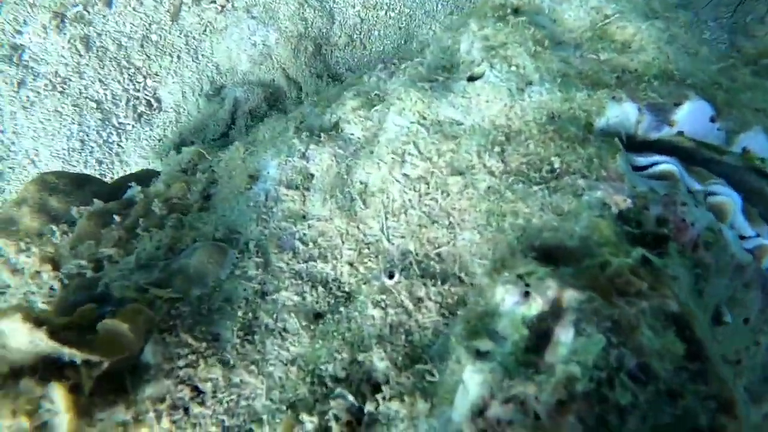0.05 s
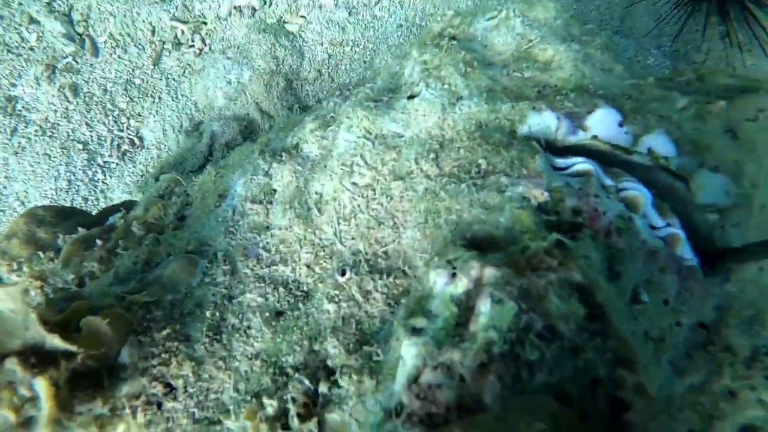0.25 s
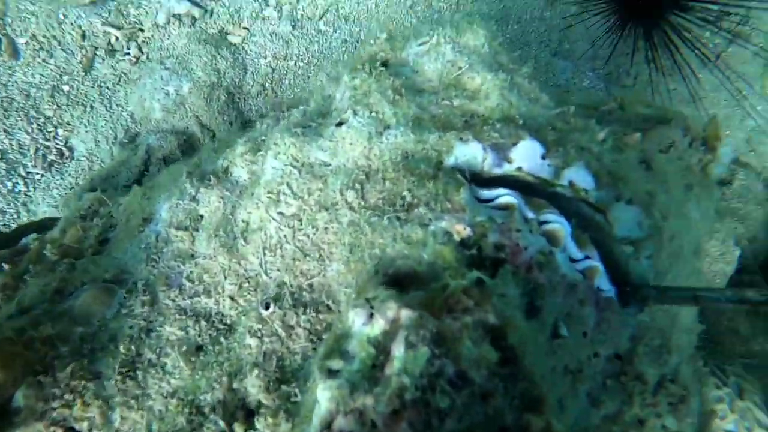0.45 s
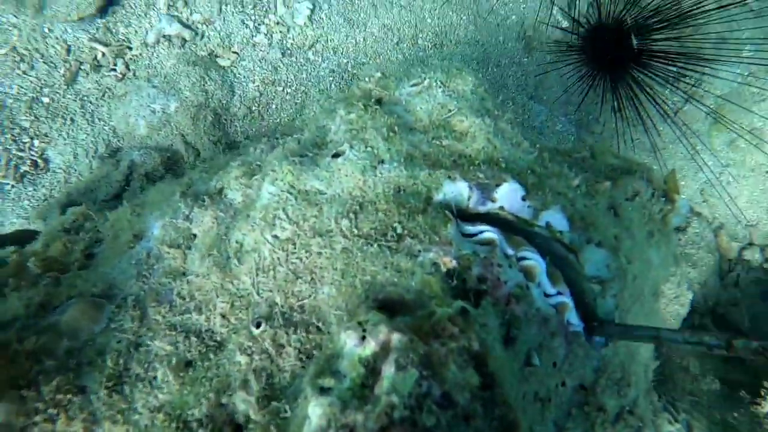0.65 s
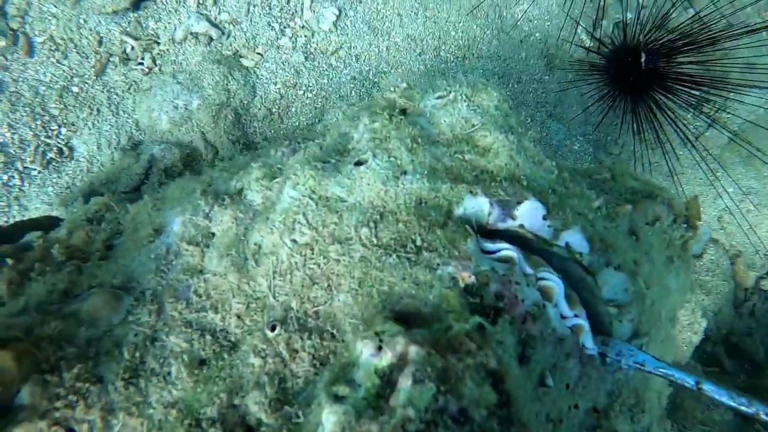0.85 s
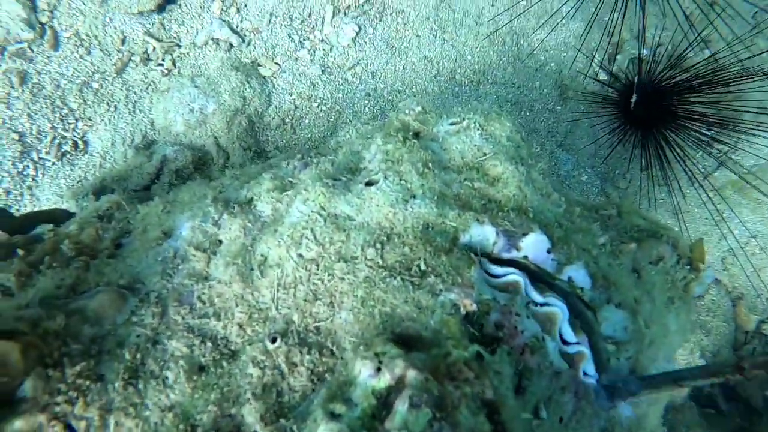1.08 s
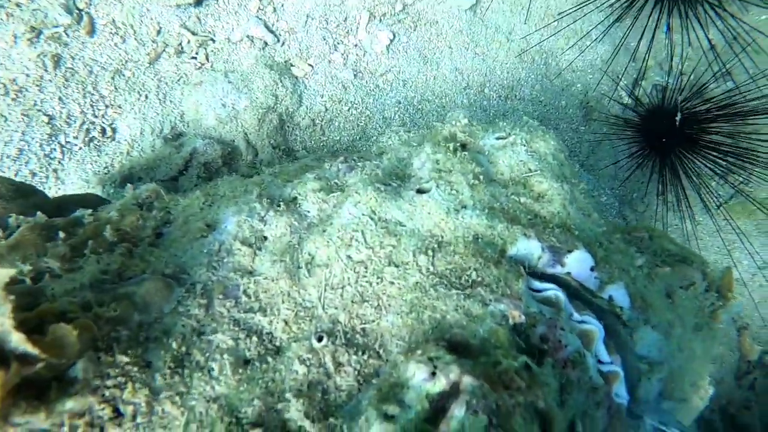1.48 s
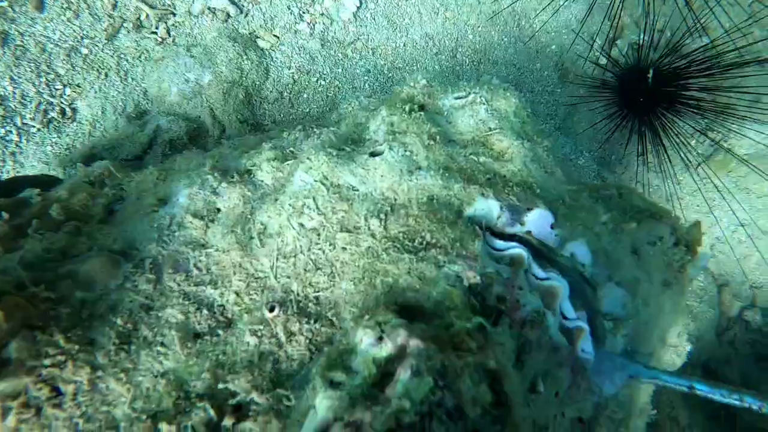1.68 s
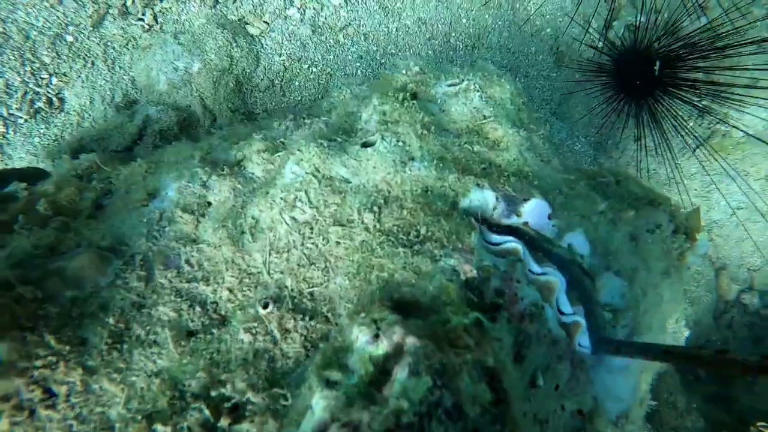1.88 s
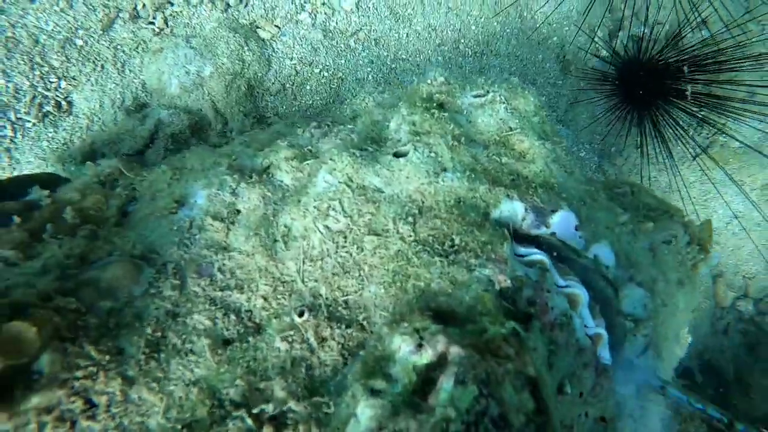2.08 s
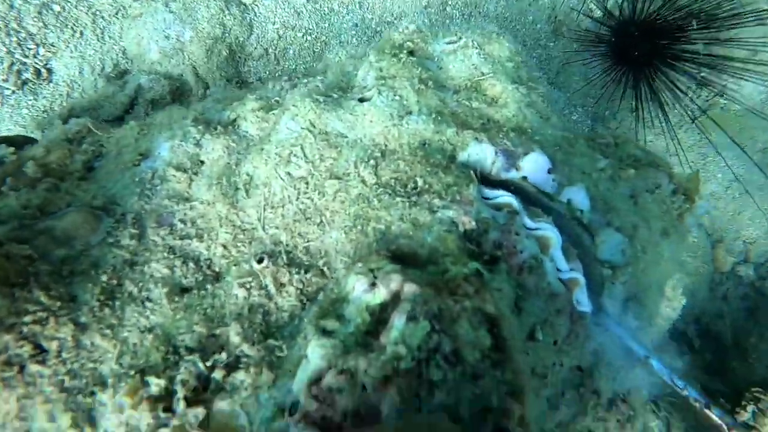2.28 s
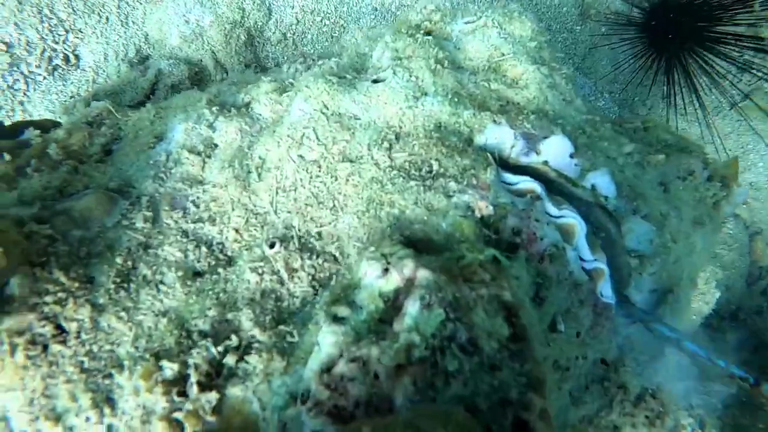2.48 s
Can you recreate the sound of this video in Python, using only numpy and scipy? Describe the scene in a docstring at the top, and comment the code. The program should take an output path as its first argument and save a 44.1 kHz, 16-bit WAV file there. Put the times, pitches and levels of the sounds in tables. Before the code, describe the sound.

A rod scrapes and knocks at a clam underwater, muffled by a camera housing, over constant low water rumble. Soft gurgles come in the first 0.7 seconds, with handling thumps around 0.4. Gritty, hollow strokes and small shell ticks follow, with stronger knocks near 0.8, 1.3 and 2.2 seconds and a heavy thump at 2. The rod catches and chatters from 1.9 to 2.4, then tiny bubbles pop.

```python
"""Prodding a clam under water

A rod pokes and scrapes at a clam in a rock, heard through a hand-held camera housing. Gritty strokes and knocks
ring the housing: hollow below 1 kHz, with metallic rings up to several kHz. The rod catches and chatters; grit
and shell tick. Handling thumps the housing, bubbles gurgle and pop, and moving water rumbles throughout."""
import sys
import numpy as np
from scipy import signal
from scipy.fft import rfft, irfft, next_fast_len
from scipy.io import wavfile
from scipy.ndimage import uniform_filter1d, map_coordinates

SR = 44100
rng = np.random.default_rng(int(sys.argv[2]) if len(sys.argv) > 2 else 0)


def bounce(signal):
    """Save signal as a 16-bit WAV file at the path given by the first command-line argument."""
    frames = np.transpose(np.atleast_2d(signal))
    limited = np.clip(frames, -1, 1)
    pcm = np.round(limited * 32767).astype(np.int16)
    wavfile.write(sys.argv[1], SR, pcm)


N = 116865

# Water rumble spectrum. Each row: frequency in Hz, gain in dB.
RUMBLE_SPECTRUM = [(12, -18.5), (28, -3.5), (70, -5), (120, -12), (250, -27.5), (1500, -83.5)]
# Rumble envelope. Each row: time in seconds, level in dB.
RUMBLE_LEVELS = [(0, -46), (.26, -33.5), (.6, -35), (.9, -30.5), (1.05, -41.5), (1.23, -33), (1.3, -29),
                 (1.7, -37.5), (2.0, -29.5), (2.3, -30), (2.45, -39), (2.65, -39.5)]
# Gurgles. Each row: start in seconds, length in seconds, level in dB, relative fizz in dB.
GURGLES = [(0.138, 0.067, -33.5, -59), (0.221, 0.041, -31, -40.5), (0.264, 0.061, -30.5, -52),
           (0.583, 0.071, -30, -45)]
# Gurgle cavity. Each row: frequency in Hz, width in Hz, relative level in dB.
CAVITY_MODES = [(204, 64, 5.5), (605, 128, -1.5)]
# Knocks on the housing. Each row: time in seconds, push in dB, hollow ring in dB, rasp in dB.
KNOCKS = [(.2366, -18, -16, -30), (.4122, -13, -23, -32), (.4553, -9, -14, -20), (.6365, -13, -19, -30),
          (.8130, -4, -11, -23), (.8268, -9, -19, -24), (.8387, -10, -26, -26), (.9030, -22, -21, -18),
          (.9215, -20, -22, -16), (1.2671, -5, -12, -14), (1.4117, -12, -19, -17), (1.5555, -24, -24, -22),
          (1.5805, -22, -25, -24), (1.8768, -9, -14, -24), (1.932, -17, -18, -23), (2.017, -20, -12, -18),
          (2.051, -22, -22, -30), (2.1578, -4, -12, -28), (2.2018, -14, -19, -32), (2.229, -18, -22, -34),
          (2.3495, -24, -13, -17)]
# Housing's hollow ring. Each row: frequency in Hz, gain in dB.
HOLLOW_RESPONSE = [(40, -14.5), (130, -2.5), (300, -2), (440, 5.5), (505, 6), (555, 5.5), (640, -2),
                   (760, -4), (1000, -34.5), (1400, -63)]
# Housing's rasping upper resonances. Each row: frequency in Hz, gain in dB.
RASP_RESPONSE = [(300, -42.5), (650, 0), (800, 0.5), (870, 0.5), (955, 6.5), (1080, -13.5), (1300, -19),
                 (1680, -20), (1950, -33), (2500, -44), (3200, -107.5)]
# Metallic ring of rod and housing under grit. Each row: frequency in Hz, gain in dB.
GRIT_RESPONSE = [(600, 3), (1300, 2), (1560, 12), (1910, 0), (2090, 7), (2290, -1), (2580, 8), (3200, -13),
                 (3680, 1), (3970, -12), (4280, 0), (4800, 3), (5400, -10), (5950, -3), (6350, -10),
                 (6680, -3), (8400, -17), (10500, -22), (13500, -11), (16000, -13)]
# Rod strokes. Each row: start in seconds, end in seconds, hollow ring in dB, rasp in dB, grit in dB.
STROKES = [(0.381, 0.495, -26.5, -45, -67), (0.564, 0.589, -30.5, -40, -70),
           (0.629, 0.649, -27.5, -46, -82), (.804, 0.831, -20.5, -32.5, -64.5),
           (0.843, 0.883, -23, -29, -56), (0.894, .93, -27, -31, -55.5), (1.028, 1.06, -28.5, -35, -70.5),
           (1.076, 1.156, -36.5, -37.5, -69), (1.173, 1.201, -27.5, -31.5, -65.5),
           (1.194, 1.258, -40.5, -42.5, -73), (1.259, 1.27, -19, -23, -58), (1.271, 1.326, -31, -40, -67.5),
           (1.347, 1.419, -29, -39, -61), (1.474, 1.495, -25, -36, -67), (1.516, 1.62, -33.5, -45.5, -67.5),
           (1.695, 1.724, -33.5, -45.5, -73), (1.765, 1.789, -30, -38.5, -81),
           (1.829, 1.912, -37, -40, -79.5), (1.908, 1.969, -25, -34.5, -69),
           (1.976, 2.05, -27.5, -39.5, -67.5), (2.059, 2.141, -31.5, -47.5, -72),
           (2.131, 2.233, -28.5, -38.5, -62), (2.245, 2.354, -27, -37.5, -61),
           (2.343, 2.361, -29.5, -25, -53.5), (2.618, 2.657, -37, -48, -75)]
# Light rubbing under the strokes: hollow ring, rasp and grit, each in dB.
RUB_DB = [-44, -50, -81]
# Handling thumps. Each row: time in seconds, pitch in Hz, peak in dB.
THUMPS = [(0.397, 70, -11.5), (0.425, 72, -12), (0.458, 50, -13.5), (0.49, 45, -17.5), (0.823, 60, -13.5),
          (1.284, 66, -13.5), (2.025, 68, -6), (2.155, 60, -12)]
# Snaps of grit and shell. Each row: time in seconds, peak in dB, low-pass cutoff in Hz.
TICKS = [(0.451, -28, 2500), (0.8114, -34.5, 12200), (0.8987, -36.5, 12100), (.919, -28, 12300),
         (1.054, -42, 8850), (1.2644, -41, 2500), (1.4097, -44, 9000), (1.579, -38.5, 6000),
         (1.6865, -30.5, 5000), (1.963, -47.5, 3500), (2.0185, -34, 2650), (2.3459, -32, 7000)]
# Rod catches. Each row: start in seconds, length in seconds, pitch in Hz, level in dB.
CATCHES = [(1.088, 0.018, 380, -32.5), (1.242, 0.0055, 880, -27.5), (1.919, 0.025, 600, -23),
           (2.293, 0.019, 322, -24), (2.004, 0.012, 500, -24), (2.139, 0.012, 440, -21.5),
           (2.198, 0.021, 430, -22), (2.27, 0.005, 480, -22.5), (2.299, 0.023, 560, -15.5),
           (2.332, 0.0085, 379.3, -23.5), (2.341, 0.0033, 870, -29.5), (2.359, 0.016, 565, -19),
           (2.385, .026, 535, -31.5)]
# Single bubbles. Each row: start in seconds, pitch in Hz, envelope peak in dB, decay in seconds.
BUBBLES = [(2.45, 413, -22.5, 0.0016), (2.493, 575, -28, 0.0042), (2.492, 867, -31, 0.0017)]


def undb(db):
    return 10 ** (np.asarray(db) / 20)


def unit_rms(x):
    return x / np.sqrt(np.mean(x ** 2))


def steady_rms(x, window_s=.025):
    """Hold the running rms at 1, keeping the fine grain."""
    return x / np.sqrt(uniform_filter1d(x ** 2, int(window_s * SR)))


def colour(x, response):
    """Minimum-phase filter through (Hz, dB) points."""
    hz, db = np.array(response).T
    size = next_fast_len(2 * N)
    bins_hz = np.maximum(np.fft.rfftfreq(size, 1 / SR), 1)
    gain = undb(np.interp(np.log(bins_hz), np.log(hz), db))
    cepstrum = irfft(np.log(gain), size)
    cepstrum[1:size // 2] *= 2
    cepstrum[size // 2 + 1:] = 0
    return irfft(rfft(x, size) * np.exp(rfft(cepstrum)), size)[:N]


def resonate(x, hz, width_hz, passes=1):
    """Two-pole band-pass per pass, gain 1 at the centre."""
    for _ in range(passes):
        x = signal.lfilter(*signal.iirpeak(hz, hz / width_hz, fs=SR), x)
    return x


def wander(rate_hz):
    """Smooth random motion, rms 1."""
    knots = rng.standard_normal(2048)
    return unit_rms(map_coordinates(knots, [np.arange(N) / SR * rate_hz], mode="wrap"))


def grains(per_s, spread_db):
    """Random clicks; spread_db makes a few much larger."""
    occurs = rng.random(N) < per_s / SR
    size = np.minimum(rng.exponential(size=N), 5)
    return occurs * undb(spread_db * size) * rng.choice([-1, 1], N)


def gate(t, start_s, length_s, attack_s=.004, release_s=.006):
    """Linear attack, hold, exponential release."""
    attack = np.clip((t - start_s) / attack_s + .5, 0, 1)
    return attack * np.exp(-np.maximum(t - start_s - length_s, 0) / release_s)


def strike(times_s, peaks_db, response):
    """Impulses ringing a response."""
    ring = colour(signal.unit_impulse(N), response)
    hits = np.zeros(N)
    for at_s, db in zip(times_s, peaks_db):
        hits[int(at_s * SR)] += undb(db)
    return signal.fftconvolve(hits, ring / np.abs(ring).max())[:N]


def water(t):
    """Water rumbles past the housing."""
    level_db = np.interp(t, *np.array(RUMBLE_LEVELS).T)
    return undb(level_db) * unit_rms(colour(rng.standard_normal(N), RUMBLE_SPECTRUM))


def gurgles(t):
    """Churning water and air ring a cavity, with a faint fizz."""
    churn = grains(per_s=630, spread_db=0)
    modes = [undb(db) * unit_rms(resonate(churn, hz, width_hz, passes=2))
             for hz, width_hz, db in CAVITY_MODES]
    cavity = unit_rms(sum(modes))
    fine_clicks = grains(per_s=5400, spread_db=.5)
    fizz = unit_rms(resonate(fine_clicks, hz=3800, width_hz=2400, passes=4))
    return sum(undb(db) * gate(t, start_s, length_s, attack_s=.016) * (cavity + undb(fizz_db) * fizz)
               for start_s, length_s, db, fizz_db in GURGLES)


def knocks(t, push_s=.00055, ring_lead_s=.0025):
    """Contact rings the housing, then a soft push flexes it and it springs back."""
    times_s, push_db, hollow_db, rasp_db = np.array(KNOCKS).T
    hollow = strike(times_s - ring_lead_s, hollow_db, HOLLOW_RESPONSE)
    rasp = strike(times_s - ring_lead_s, rasp_db, RASP_RESPONSE)
    push = -sum(undb(db) * np.exp(-.5 * ((t - at_s) / push_s) ** 2)
                for at_s, db in zip(times_s, push_db))
    spring_back = -resonate(push, hz=55, width_hz=70)
    return push + spring_back + hollow - rasp


def scraping(t, judder_db=1.5, lift_db=-11):
    """Juddering stick-slip rings the housing, hollow or rasping; fine grit crackles with it."""
    judder = unit_rms(undb(judder_db * wander(rate_hz=113.13)))
    slips = judder * grains(per_s=1400, spread_db=2.5)
    crackle = judder * grains(per_s=1500, spread_db=2.8)
    rub_contact = 1 - (1 - undb(lift_db)) * gate(t, start_s=2.38, length_s=.10)
    starts_s, ends_s, *stroke_db = np.array(STROKES).T

    def layer(index, force, response, edge_s):
        gates = np.array([gate(t, start_s, length_s, edge_s, edge_s)
                          for start_s, length_s in zip(starts_s, ends_s - starts_s)])
        stroke_power = undb(stroke_db[index]) ** 2 @ gates ** 2
        rub_power = (undb(RUB_DB[index]) * rub_contact) ** 2
        return np.sqrt(stroke_power + rub_power) * steady_rms(colour(force, response))

    hollow = layer(0, slips, HOLLOW_RESPONSE, edge_s=.006)
    rasp = layer(1, slips, RASP_RESPONSE, edge_s=.006)
    grit = layer(2, crackle, GRIT_RESPONSE, edge_s=.009)
    return hollow + rasp + grit


def thumps(t, attack_s=.0021, decay_s=.01):
    """The grip shifts: one or two slow swings of pressure."""
    out = np.zeros(N)
    for at_s, hz, db in THUMPS:
        age_s = t - at_s
        width_s = np.where(age_s < 0, attack_s, decay_s)
        out -= undb(db) * np.exp(-(age_s / width_s) ** 2) * np.cos(2 * np.pi * hz * age_s)
    return out


def ticks():
    """Hard contacts ring rod and housing; blunter ones lose the treble."""
    ring = colour(signal.unit_impulse(N), GRIT_RESPONSE)
    out = np.zeros(N)
    for at_s, db, cutoff_hz in TICKS:
        tick = signal.lfilter(*signal.butter(1, cutoff_hz, fs=SR), ring)
        start = int(at_s * SR)
        out[start:] += undb(db) * tick[:N - start] / np.abs(tick).max()
    return out


def catches(t, chatter_hz=260, wobble_depth=.09, roughness_db=3, sag_per_s=2):
    """The sticking rod chatters in short, rough groans that sag in pitch as it lets go."""
    wobble = wobble_depth * wander(chatter_hz)
    roughness = steady_rms(undb(roughness_db * wander(chatter_hz)))
    out = np.zeros(N)
    for start_s, length_s, hz, db in CATCHES:
        pitch_hz = hz * np.exp(wobble - sag_per_s * np.maximum(t - start_s, 0))
        tone = unit_rms(np.sin(2 * np.pi * np.cumsum(pitch_hz) / SR))
        out += undb(db) * gate(t, start_s, length_s, release_s=.005) * tone
    return roughness * out


def bubbles(t, attack_s=.0032, rise_per_s=.25):
    """Each bubble rings briefly, its pitch barely rising."""
    out = np.zeros(N)
    for start_s, hz, db, decay_s in BUBBLES:
        age_s = np.maximum(t - start_s, 0)
        envelope = (1 - np.exp(-(age_s / attack_s) ** 2)) * np.exp(-age_s / decay_s)
        tone = np.sin(2 * np.pi * hz * age_s * (1 + rise_per_s * age_s))
        out += undb(db) * envelope / envelope.max() * tone
    return out


def scene():
    """All sources at one microphone."""
    t = np.arange(N) / SR
    contacts = knocks(t) + scraping(t) + thumps(t) + ticks() + catches(t)
    return (contacts + gurgles(t) + bubbles(t) + water(t))[None]


def record(dry, low_cut_hz=4, high_cut_hz=15800):
    """The camera cuts the deepest bass and the top."""
    high_pass = signal.butter(1, low_cut_hz, "high", fs=SR, output="sos")
    low_pass = signal.ellip(8, .2, 70, high_cut_hz, fs=SR, output="sos")
    return signal.sosfilt(low_pass, signal.sosfilt(high_pass, dry))


dry = scene()
out = record(dry)
bounce(out)
```